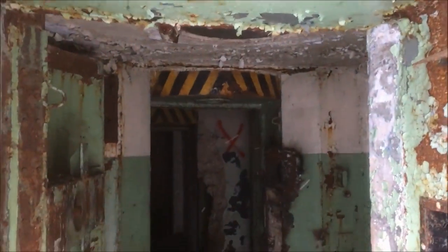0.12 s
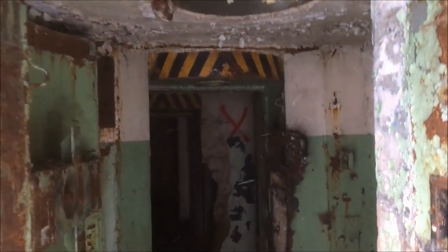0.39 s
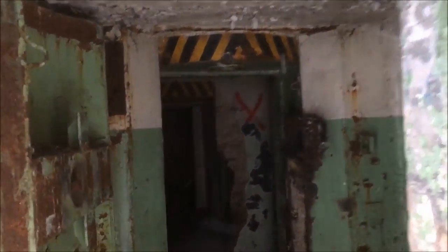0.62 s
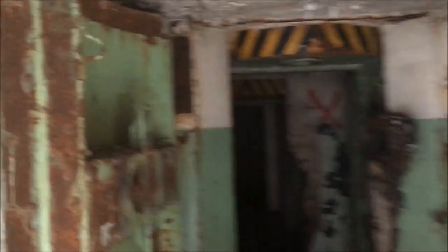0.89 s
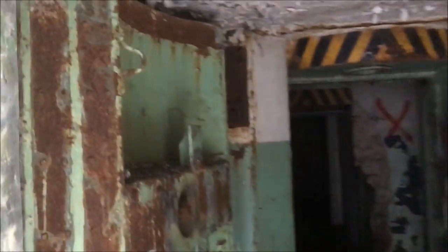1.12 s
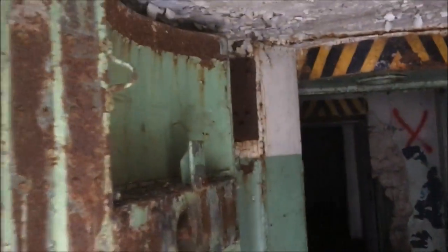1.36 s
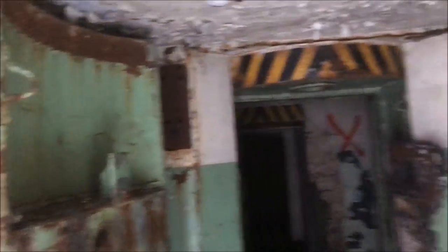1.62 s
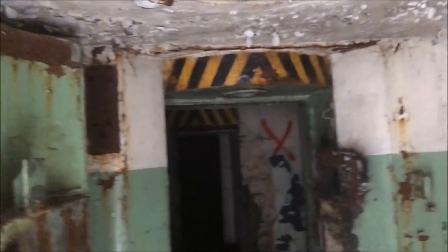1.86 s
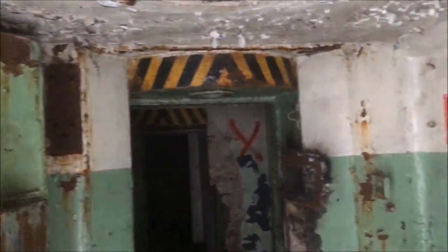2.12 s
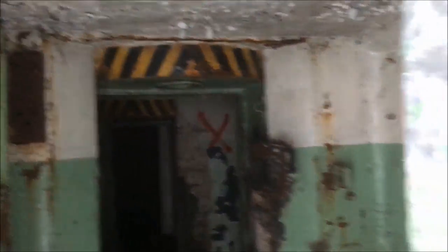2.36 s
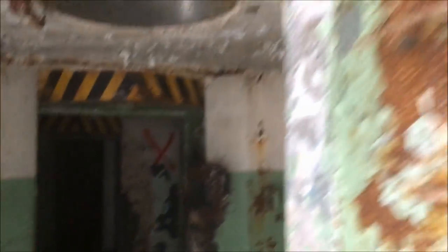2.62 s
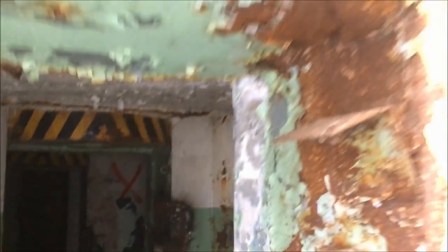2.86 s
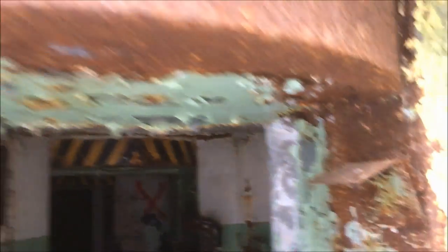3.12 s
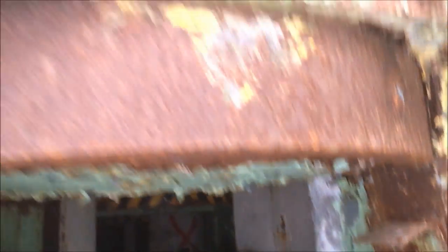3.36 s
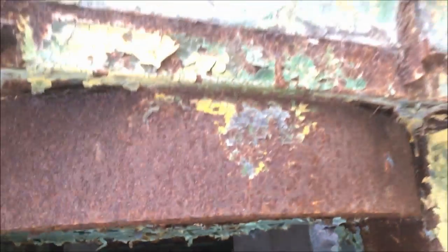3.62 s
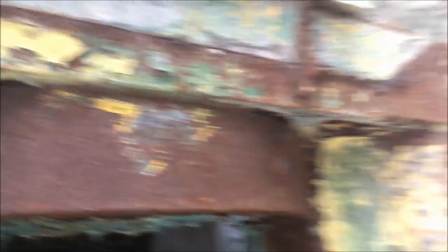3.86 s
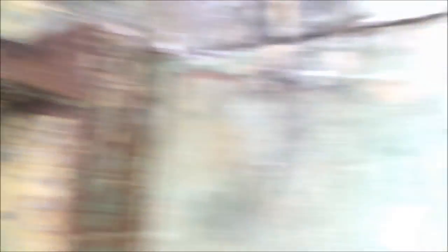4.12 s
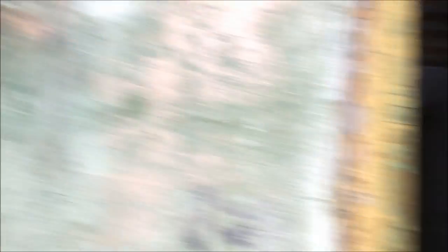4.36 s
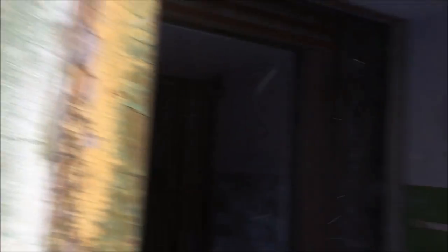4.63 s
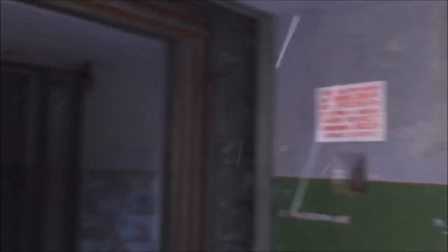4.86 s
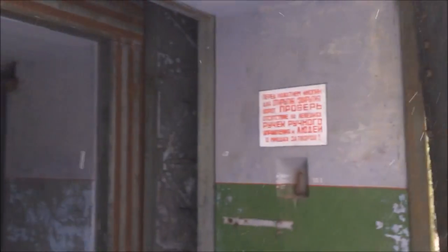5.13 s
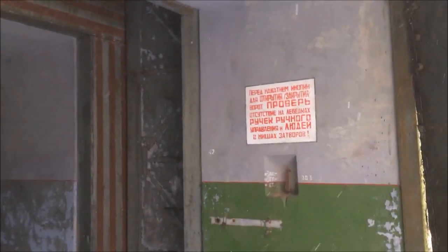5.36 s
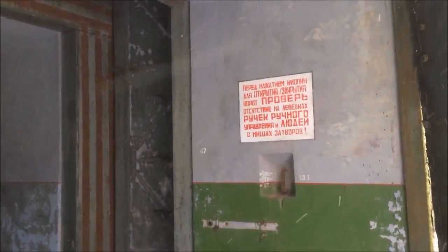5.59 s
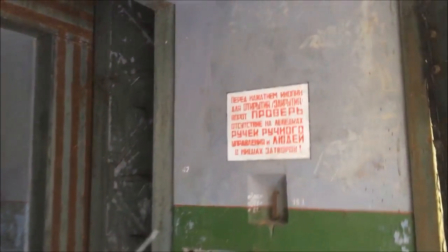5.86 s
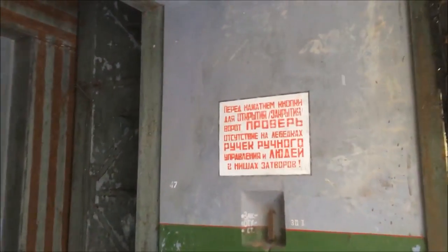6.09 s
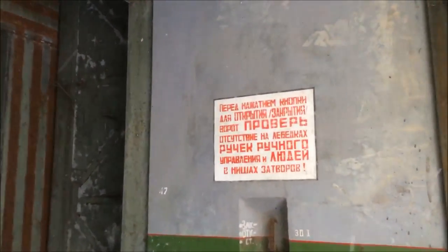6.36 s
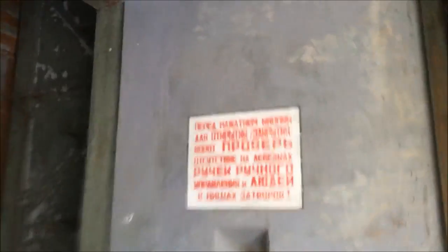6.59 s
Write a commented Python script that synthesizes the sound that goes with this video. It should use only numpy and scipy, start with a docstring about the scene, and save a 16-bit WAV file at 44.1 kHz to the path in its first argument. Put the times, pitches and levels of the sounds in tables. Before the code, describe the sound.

Near-silence with soft cloth rustle, then a quick bright crackle of crust underfoot and a small knock. The walker shifts weight softly for several seconds, with tiny rubs and muffled taps. Then a burst of solid, woody-sounding footfalls with low slab thuds, scattered grit crunching, a short lull and one last rough step. Mono, close handheld pickup in a bare concrete entrance, wavering low rumble, faint hiss.

```python
"""Door of a concrete bunker: a walker shifts about on crusted snow and grit, then steps inside.
Crust breaks as noise bursts, soles squeak as resonant noise, knocks and the slab ring as decaying sines.
Rustle, scuff and body weight are coloured noise under movement envelopes.
Feedback delays return the blows; rumble is low noise that wavers in level, faint hiss is steady noise.
A small hand-held microphone dips narrow parts of the treble and cuts the top."""
import sys
import numpy as np
from scipy import signal
from scipy.fft import rfft, irfft, next_fast_len
from scipy.io import wavfile

SR = 44100
rng = np.random.default_rng(int(sys.argv[2]) if len(sys.argv) > 2 else 0)


def materialize(psi):
    """Save the field psi as 16-bit PCM at rate SR to the path in sys.argv[1].

    A 1-D psi becomes a single channel; in a 2-D psi each row is a channel.
    """
    bounded = np.clip(np.atleast_2d(psi).T, -1, 1)
    quanta = np.round(bounded * 32767).astype(np.int16)
    wavfile.write(sys.argv[1], SR, quanta)


def field_ratio(decibels):
    """Amplitude ratio for a level in dB (20 dB per decade); scalars and array-likes work."""
    return 10 ** (np.asarray(decibels, dtype=float) / 20)


N = 296793
CLOCK_S = np.arange(0, N / SR + .001, .001)   # movement is worked out once a millisecond


def rms_one(x):
    """Scales to rms 1."""
    return x / np.sqrt(np.mean(x ** 2) + 1e-20)


def in_time(rows):
    """A (time_s, value) curve at every sample."""
    time_s, value = np.transpose(rows)
    return np.interp(np.arange(N) / SR, time_s, value)


def add(out, start_s, sound):
    """Mixes a sound in at start_s."""
    at = round(start_s * SR)
    out[at:at + len(sound)] += sound[:N - at]


def drift(pole_hz):
    """Slow noise, rms 1: a double one-pole low-pass at every 20th sample, run in, interpolated."""
    r = np.exp(-2 * np.pi * pole_hz * 20 / SR)
    white = rng.standard_normal(N // 20 + 2002)
    slow = signal.lfilter([1], [1, -2 * r, r * r], white)[2000:]
    return np.interp(np.arange(N) / 20, np.arange(len(slow)), rms_one(slow))


def colour(x, spectrum):
    """Filters a source by (freq_hz, gain_db), straight lines over log frequency; rms 1."""
    freq_hz, gain_db = np.transpose(spectrum)
    size = next_fast_len(N)
    grid_hz = np.maximum(np.arange(size // 2 + 1) * SR / size, 1)
    gain = field_ratio(np.interp(np.log(grid_hz), np.log(freq_hz), gain_db, -90, -90))
    return rms_one(irfft(rfft(x, size) * gain, size)[:N])


def contact(t, rise_s):
    """Soft build-up of a contact over a few rise_s."""
    return (1 - np.exp(-t / rise_s)) ** 2


def ring(t, pitch_hz, t60_s, rise_s):
    """A struck mode: decaying sine behind a soft contact."""
    return np.sin(2 * np.pi * pitch_hz * t) * field_ratio(-60 * t / t60_s) * contact(t, rise_s)


# crust and grit breaking: start_s, level_db, centre_hz, t60_s
CRUST_BREAKS = [(0.0633, -46.5, 6200, 0.053), (0.1235, -46, 3970, 0.047), (0.177, -42, 6300, 0.035),
                (0.761, -34, 5860, 0.033), (0.815, -35, 6630, 0.04), (0.836, -27, 2950, 0.02),
                (0.856, -27.5, 4680, 0.037), (0.9241, -27, 2820, 0.035), (0.9557, -31.5, 3630, 0.022),
                (1.047, -43.5, 2660, 0.049), (1.215, -43.5, 3370, 0.087), (2.8076, -45, 5970, 0.044),
                (2.847, -46, 1950, 0.053), (2.9615, -45, 7270, 0.051), (3.1695, -45, 2010, 0.047),
                (3.263, -49.5, 1810, 0.044), (3.3805, -38, 4050, 0.065), (3.432, -53, 2260, 0.027),
                (3.7019, -44, 5450, 0.04), (3.9592, -36, 2420, 0.057), (4.5653, -50, 1970, 0.067),
                (4.7145, -37, 2530, 0.1), (4.864, -38.5, 2180, 0.06), (4.879, -36, 2940, 0.056),
                (4.905, -34.5, 2120, 0.076), (4.9376, -38, 1970, 0.035), (5.012, -31, 1800, 0.04),
                (5.0294, -27.5, 1800, 0.018), (5.0435, -29, 1860, 0.13), (5.073, -40, 3740, 0.044),
                (5.5482, -31, 1890, 0.047), (5.6177, -35, 1980, 0.017), (5.632, -45, 3000, 0.025),
                (5.671, -37.5, 2150, 0.033), (5.6938, -38.5, 2420, 0.04), (5.719, -39.5, 2420, 0.028),
                (5.7527, -35, 2240, 0.078), (5.8095, -30, 1890, 0.037), (5.902, -30.5, 2320, 0.048),
                (6.152, -41.5, 2100, 0.037), (6.6032, -29.5, 2170, 0.099), (6.7157, -30, 3540, 0.039)]


def crunch():
    """Each break is a sudden noise burst that dies, broad around its own centre."""
    out, t = np.zeros(N), np.arange(SR // 4) / SR
    noise = rng.standard_normal((len(CRUST_BREAKS), len(t)))
    for (start_s, level_db, centre_hz, t60_s), white in zip(CRUST_BREAKS, noise):
        edges_hz = [centre_hz * 0.49, min(centre_hz * 1.26, 17000)]
        broad = signal.sosfilt(signal.butter(1, edges_hz, "band", fs=SR, output="sos"), white)
        envelope = field_ratio(-60 * t / max(t60_s, .005)) * (1 - np.exp(-t / 0.00074))
        add(out, start_s, field_ratio(level_db - 3) * rms_one(broad) * envelope)
    return out


# sole on something hard: start_s, level_db, pitch_hz, upper_hz, upper_level_db
SOLE_KNOCKS = [(0.774, -48.5, 341, 930, -51), (0.8357, -33.5, 593, 1160, -40), (0.857, -47, 226, 1480, -46),
               (0.925, -24.5, 670, 986, -22), (0.964, -40.5, 577, 990, -51), (1.214, -50, 378, 988, -52),
               (1.716, -51, 399, 760, -72), (1.732, -47.5, 426, 770, -72), (2.931, -51, 396, 790, -62),
               (2.944, -37.5, 243, 426, -57), (3.169, -53, 308, 830, -48), (3.382, -42, 610, 980, -39),
               (3.956, -38.5, 276, 660, -40), (4.568, -63, 320, 1140, -53), (4.716, -45.5, 602, 1460, -54),
               (4.862, -33.5, 437, 860, -30), (4.879, -23.5, 463, 1160, -34),
               (4.907, -25.5, 270, 1410, -37), (5.013, -32, 405, 1190, -37), (5.031, -49, 590, 1350, -38),
               (5.0467, -13, 543, 654, -6.5), (5.055, -23, 460, 800, -29), (5.5489, -36, 300, 903, -21),
               (5.552, -24.5, 269, 695, -43), (5.616, -37, 303, 1130, -39), (5.754, -36, 243, 1290, -48),
               (5.903, -41, 267, 1070, -61), (6.274, -52.5, 223, 1070, -46), (6.602, -36, 358, 1040, -50),
               (6.716, -27.5, 283, 738, -28.5)]
# modes of a knock: pitch_ratio, gain_db, t60_share
KNOCK_MODES = [(1.0, 4.5, 0.73), (1.45, -11.5, 0.74), (.55, -4.5, 1.24)]


def knocks():
    """Each blow rings what it meets; duller ones ring longer, the sole damps harder ones."""
    contact_s, uneven_db = 0.001, 0.76
    dull_longer, hard_shorter = 0.27, 0.28   # dB of ring length per dB of level
    out, t = np.zeros(N), np.arange(SR // 3) / SR
    chance = rng.normal(0, 1, (len(SOLE_KNOCKS), len(KNOCK_MODES)))
    for (start_s, level_db, pitch_hz, upper_hz, upper_db), draws in zip(SOLE_KNOCKS, chance):
        length_db = dull_longer * (level_db - upper_db) - hard_shorter * (level_db + 32)
        t60_s = 0.048 * field_ratio(length_db)   # before each mode takes its share
        blow = field_ratio(upper_db + 4.5) * ring(t, upper_hz, max(t60_s * 0.47, .004), contact_s)
        for (ratio, gain_db, share), draw in zip(KNOCK_MODES, draws):
            mode = ring(t, pitch_hz * ratio, max(t60_s * share, .004), contact_s)
            blow = blow + field_ratio(level_db + gain_db + uneven_db * draw) * mode
        add(out, start_s, blow)
    return out


# heel shakes the slab: start_s, level_db
HEEL_BLOWS = [(0.837, -52), (0.926, -42), (0.964, -44.5), (1.215, -51.5), (1.724, -48), (2.945, -46),
              (3.382, -49.5), (3.957, -44), (4.717, -50.5), (4.862, -39), (4.879, -33.5), (4.907, -35),
              (5.014, -36), (5.03, -29), (5.045, -30), (5.055, -44), (5.55, -49), (5.616, -50),
              (5.752, -39), (5.904, -52), (6.603, -37), (6.715, -28)]
# modes of the floor slab: pitch_hz, gain_db, t60_s
SLAB_MODES = [(58.4, 0.5, 0.19), (114.2, 8, 0.096), (172.5, -5.5, 0.18), (225.5, 10, 0.042)]


def heels():
    """The slab answers a heel slowly and low, its modes unevenly excited."""
    spread_db, rise_s = 2.0, 0.0058
    out, t = np.zeros(N), np.arange(SR // 3) / SR
    chance = rng.normal(0, 1, (len(HEEL_BLOWS), len(SLAB_MODES)))
    for (start_s, level_db), draws in zip(HEEL_BLOWS, chance):
        thud = sum(field_ratio(level_db + gain_db + spread_db * draw) * ring(t, pitch_hz, t60_s, rise_s)
                   for (pitch_hz, gain_db, t60_s), draw in zip(SLAB_MODES, draws))
        add(out, start_s, thud)
    return out


# short coloured rubs of sole on grit: start_s, level_db, centre_hz, length_s
SOLE_RUBS = [(0.544, -51, 910, 0.028), (0.59, -51, 880, 0.018), (1.688, -50, 2050, 0.043),
             (1.723, -46.5, 2000, 0.042), (1.805, -59, 1450, 0.064), (2.308, -55, 1600, 0.034),
             (2.377, -55, 1050, 0.034), (2.783, -49, 2280, 0.037), (3.163, -48, 985, 0.04),
             (3.426, -46, 2240, 0.025), (3.745, -51, 1090, 0.051), (3.919, -51, 1570, 0.054),
             (3.927, -41, 2400, 0.064), (4.7065, -44, 2420, 0.042), (4.819, -39, 1400, 0.024),
             (5.772, -38, 1290, 0.021), (6.298, -49, 1530, 0.046)]


def squeaks():
    """Stick and slip: a swell of noise through a resonance."""
    out, t = np.zeros(N), np.arange(SR // 5) / SR
    noise = rng.standard_normal((len(SOLE_RUBS), len(t)))
    for (start_s, level_db, centre_hz, length_s), white in zip(SOLE_RUBS, noise):
        narrow = signal.lfilter(*signal.iirpeak(centre_hz, 7.0, fs=SR), white)
        hump = np.sin(np.pi * np.minimum(t / length_s, 1))
        add(out, start_s, field_ratio(level_db - 10) * rms_one(narrow) * hump)
    return out


def swell(start_s, length_s):
    """A slide: rounded rise and fall, let go with a fade over its last tenth and beyond."""
    roundness, fade_t60_s = 0.68, 0.39
    t = CLOCK_S - start_s
    hump = np.sin(np.pi * np.clip(t / length_s, 0, .9)) ** roundness
    return hump * field_ratio(-60 * np.maximum(t - .9 * length_s, 0) / fade_t60_s)


def strike(start_s, t60_s, rise_s):
    """A bite or a load: quick rise, steady decay."""
    t = np.maximum(CLOCK_S - start_s, 0)
    return contact(t, rise_s) * field_ratio(-60 * t / max(t60_s, .05))


# cloth and boot slide: start_s, length_s, rustle_db, top_re_rustle_db, sole_re_rustle_db
SLIDES = [(-.05, .26, -64, -3.5, 0.5), (0.21, 0.52, -74.5, 2, 0), (0.457, 0.18, -65, 0, -2),
          (0.808, 0.025, -49.5, 0, 2), (0.84, 0.047, -45, -3, -2), (0.87, 0.03, -61, -14, 12),
          (0.923, 0.077, -52, -4.5, 4.5), (0.975, .29, -59.5, -0.5, -0.5), (1.267, .14, -70.5, -5, 2),
          (1.407, .135, -52.5, -3, -4.5), (1.543, 0.21, -78, -14, 13), (1.64, 0.18, -62.5, -6.5, -1),
          (1.763, 0.12, -66.5, -3, 2), (2.216, 0.32, -63, -2.5, -0.5), (2.497, 0.2, -80, 8.5, -6),
          (2.915, 0.18, -58, 0, 1.5), (3.066, 0.46, -62.5, -3.5, 2.5), (3.398, 0.1, -72, 1, 10),
          (3.464, 0.24, -59, 0.5, -3), (3.647, 0.13, -58.5, 1, -1), (3.757, 0.13, -55.5, -3.5, -5.5),
          (3.872, 0.15, -54, -6, -1), (4.047, 0.16, -62.5, -7, -4), (4.117, 0.18, -56, -6, -2),
          (4.194, 0.2, -57.5, -3, 0), (4.36, 0.43, -74, 0, 1.5), (4.766, 0.1, -56, -8.5, 1),
          (4.847, 0.19, -56, -2.5, 2), (5.633, 0.24, -60.5, -10, 5), (6.01, 0.13, -59.5, -8, 0.5),
          (6.13, 0.18, -56.5, -4.5, -1.5), (6.257, 0.14, -51.5, -4.5, -2.5), (6.33, 0.31, -55, -4, -1.5),
          (6.666, 0.17, -45, -2, -1)]
# boot bites the crust, friction dies away: start_s, t60_s, rustle_db, top_re_rustle_db, sole_re_rustle_db
BITES = [(.752, 0.55, -46.5, -1.5, -5), (2.756, 1, -57, 0.5, -2.5), (4.687, 0.39, -45.5, -8, 0),
         (5.008, 0.64, -46, -6.5, 0.5), (5.548, .6, -58, -6, 6), (5.745, 0.31, -42, -10, 2),
         (5.809, 0.55, -42, -6.5, -4.5), (5.9, 0.41, -45.5, -5.5, 2), (6.584, 0.33, -36.5, -2.5, -2.5)]
# body weight comes down on the ground: start_s, t60_s, level_db
WEIGHT_LOADS = [(0, 2.3, -60), (.18, 0.55, -71), (.56, 1.2, -61.5), (.757, .25, -57), (.815, 2.1, -53.5),
                (.94, 0.37, -52), (1.03, 0.37, -42.5), (1.22, 0.4, -62), (1.46, 0.74, -49.5),
                (1.51, 0.2, -50), (1.72, 1.2, -60.5), (2.0, 5, -68), (2.35, 1.2, -61.5), (2.77, 1.4, -57),
                (2.93, 0.93, -49.5), (3.2, 2.6, -61), (3.39, 0.21, -52.5), (3.51, 1.5, -58.5),
                (3.7, 0.63, -55.5), (3.96, 0.22, -43), (4.11, 6.7, -59), (4.56, 1.1, -66), (4.72, 3, -54.5),
                (4.857, 0.95, -39), (4.91, 0.26, -44), (5.008, 0.57, -33), (5.05, 0.45, -33.5),
                (5.15, 1.9, -46), (5.546, 0.64, -40), (5.75, 1.65, -47.5), (5.94, 0.41, -50),
                (6.35, 1.2, -56), (6.59, 1.2, -45.5), (6.7, 1.1, -47)]
# standing still: rustle_db, top_db, scuff_db, weight_db
STILL_DB = (-88, -84.5, -77, -73.5)


def movement():
    """Gains of rustle, its top, scuff and weight; overlapping moves add in power."""
    bite_rise_s, load_rise_s = 0.011, 0.0041
    power = field_ratio(np.array(STILL_DB))[:, None] ** 2 * np.ones(len(CLOCK_S))
    moves = [(swell(start_s, length_s), *levels) for start_s, length_s, *levels in SLIDES]
    moves += [(strike(start_s, t60_s, bite_rise_s), *levels) for start_s, t60_s, *levels in BITES]
    for shape, rustle_db, top_db, sole_db in moves:
        levels_db = rustle_db + np.array([[0], [top_db], [sole_db]])
        power[:3] += field_ratio(levels_db) ** 2 * shape ** 2
    for start_s, t60_s, level_db in WEIGHT_LOADS:
        power[3] += (field_ratio(level_db) * strike(start_s, t60_s, load_rise_s)) ** 2
    return [np.interp(np.arange(N) / SR, CLOCK_S, gain) for gain in np.sqrt(power)]


def grains(per_s, spread_db, smooth):
    """Friction: random clicks of uneven size, rms 1, over smooth noise of rms smooth."""
    sizes = field_ratio(spread_db * np.minimum(rng.exponential(1, N), 4)) * rng.choice([-1, 1], N)
    clicks = rms_one(sizes * (rng.random(N) < per_s / SR))
    return clicks + smooth * rng.standard_normal(N)


def patchy(per_s, spread_db, smooth, pole_hz):
    """Grains in third-octave bands that each waver; neighbours get unrelated grains."""
    patchy_db = 1.2
    edges_hz = np.geomspace(280, 17500, 19)
    sources = [grains(per_s, spread_db, smooth) for _ in range(2)]
    out = np.zeros(N)
    for k, band_hz in enumerate(zip(edges_hz, edges_hz[1:])):
        band = signal.sosfilt(signal.butter(2, band_hz, "band", fs=SR, output="sos"), sources[k % 2])
        out += field_ratio(patchy_db * drift(pole_hz)) * band
    return out


# winter clothing: freq_hz, gain_db
RUSTLE_SPECTRUM = [(1300, -43), (2200, 1.5), (3200, 2.5), (5000, 0.5), (6500, -4), (8000, -9.5),
                   (11000, -23.5)]
# the brightest part of the rustle: freq_hz, gain_db
TOP_SPECTRUM = [(4500, -14), (6500, -4.5), (8000, -4.5), (10000, -1), (13000, -9), (16000, -8.5),
                (17000, -30)]


def rustle(cloth, top, catch_db):
    """One grainy rub in two colours, each following its own movement gain."""
    rub = patchy(per_s=4000, spread_db=6.0, smooth=1.4, pole_hz=5.3)
    return field_ratio(catch_db) * (cloth * colour(rub, RUSTLE_SPECTRUM) + top * colour(rub, TOP_SPECTRUM))


# sole on crust: freq_hz, gain_db
SCUFF_SPECTRUM = [(300, -9.5), (500, -2), (800, 0.5), (1300, 1.5), (2000, -1), (2600, -8), (4000, -23.5)]


def scuff(sole, catch_db):
    """Sparser, more even grains of the sole, catching less than the cloth."""
    rub = patchy(per_s=1400, spread_db=1.5, smooth=0.9, pole_hz=9.6)
    return sole * field_ratio(0.43 * catch_db) * colour(rub, SCUFF_SPECTRUM)


# ground under load: freq_hz, gain_db
WEIGHT_SPECTRUM = [(70, -43), (120, 2.5), (200, 0.5), (350, -2), (500, -7.5), (800, -11.5), (1400, -28)]


def weight(load):
    """Low noise of ground pressed by the body, wavering in level."""
    return load * field_ratio(1.6 * drift(9.2)) * colour(rng.standard_normal(N), WEIGHT_SPECTRUM)


# sound sent to the walls: time_s, send_db
WALL_SEND = [(0, -24.5), (4.4, -26.5), (4.9, -31), (6.73, -18)]


def bunker(blows):
    """Wall returns: ten feedback delays, duller on every round, summed with alternate signs."""
    t60_s, wall_cut_hz = 0.81, 2000   # t60 at the lowest frequencies
    size = next_fast_len(N + SR)
    turn = np.exp(-2j * np.pi * np.arange(size // 2 + 1) / size)   # one sample of delay
    pole = np.exp(-2 * np.pi * wall_cut_hz / SR)
    dull = (1 - pole) / (1 - pole * turn)
    walls = 0
    for k, lag in enumerate(np.floor(np.geomspace(.009, .043, 10) * SR)):
        loop = field_ratio(-60 * lag / SR / t60_s) * dull * turn ** lag
        walls = walls + (-1) ** k * loop / (1 - loop)
    sent = blows * field_ratio(in_time(WALL_SEND))
    return irfft(rfft(sent, size) * walls, size)[:N]


# wavering rumble: time_s, level_db
RUMBLE_LEVEL = [(0.0, -55), (0.51, -53.5), (0.96, -58), (1.69, -53.5), (2.06, -56.5), (2.6, -56.5),
                (2.98, -51.5), (3.35, -53.5), (3.69, -60.5), (4.46, -56), (4.67, -61.5), (5.0, -44),
                (5.25, -61), (5.55, -54), (5.83, -52), (6.24, -65.5), (6.73, -44)]
# rumble: freq_hz, gain_db
RUMBLE_SPECTRUM = [(15, -42), (25, -24), (40, -3.5), (60, 0.5), (85, 0), (120, -18.5), (170, -12.5),
                   (260, -36.5)]


def rumble():
    """Low noise whose level follows a curve plus a slow random drift."""
    level_db = in_time(RUMBLE_LEVEL) + 2.6 * drift(2.9)
    return field_ratio(level_db) * colour(rng.standard_normal(N), RUMBLE_SPECTRUM)


# still air: freq_hz, gain_db
HISS_SPECTRUM = [(76, -35), (130, -0.5), (291, -12), (378, -2), (532, -13.5), (863, -21), (1750, -15),
                 (2830, -20), (3390, -19.5), (4980, -20.5), (5620, -22), (8920, -24), (14200, -27.5),
                 (16000, -33)]


def hiss():
    """Still air: steady coloured noise, rms -66 dB."""
    return field_ratio(-66) * colour(rng.standard_normal(N), HISS_SPECTRUM)


def scene():
    """Friction and weight follow the movement; blows also sound in the bunker."""
    cloth, top, sole, load = movement()
    catch_db = 1.6 * drift(27)   # fibres and crystals catch and let go
    blows = crunch() + knocks() + heels() + squeaks()
    friction = rustle(cloth, top, catch_db) + scuff(sole, catch_db)
    mix = blows + friction + weight(load) + bunker(blows) + rumble() + hiss()
    return mix[None]


def top_cut(x):
    """Nothing passes above the cut-off."""
    return signal.sosfilt(signal.butter(12, 16610, fs=SR, output="sos"), x)


# narrow dips of the microphone housing: centre_hz, width_hz, gain_db
HOUSING_DIPS = [(2740, 820, -3.5), (4900, 790, -4), (7600, 300, -3), (10380, 890, -7)]


def record(dry):
    """Microphone: housing resonances subtract narrow dips, a steep low-pass cuts the top."""
    for centre_hz, width_hz, gain_db in HOUSING_DIPS:
        resonance = signal.lfilter(*signal.iirpeak(centre_hz, centre_hz / width_hz, fs=SR), dry)
        dry = dry - (1 - field_ratio(gain_db)) * resonance
    low_pass = signal.cheby2(14, 60, 16116, fs=SR, output="sos")   # 60 dB down from 16116 Hz
    return top_cut(signal.sosfilt(low_pass, dry))


dry = scene()
out = record(dry)
materialize(out)
```